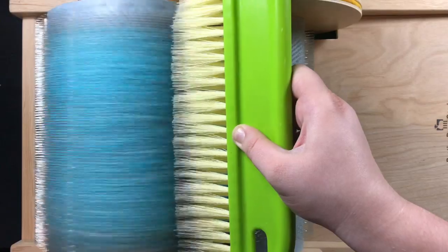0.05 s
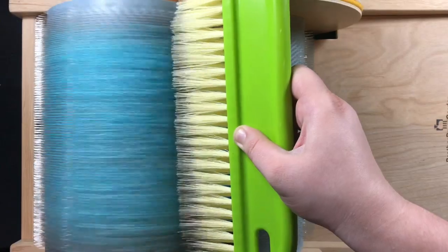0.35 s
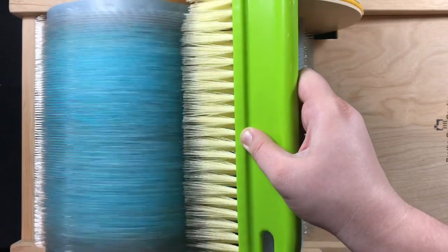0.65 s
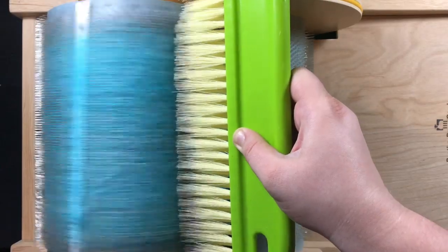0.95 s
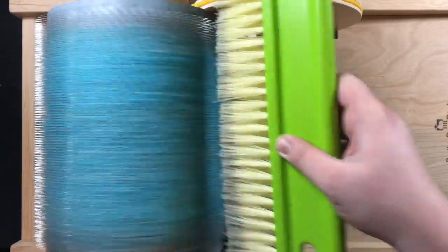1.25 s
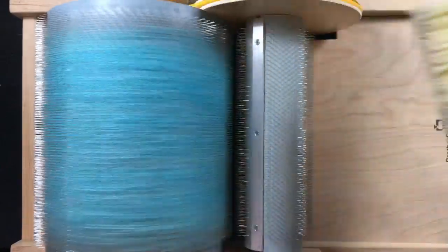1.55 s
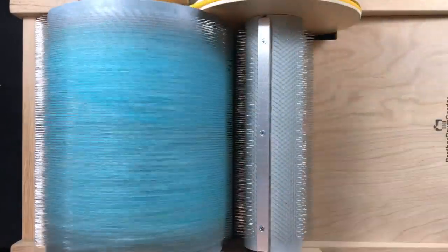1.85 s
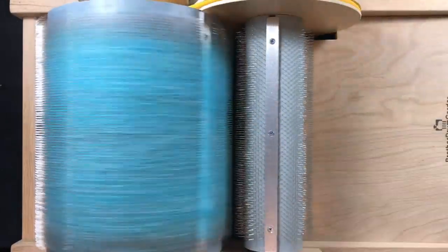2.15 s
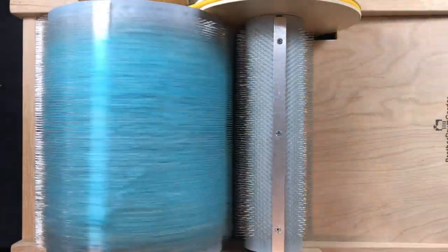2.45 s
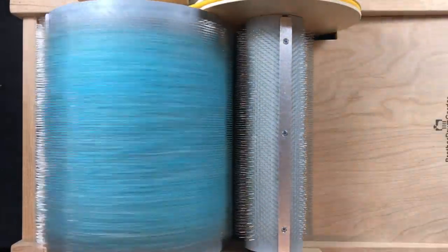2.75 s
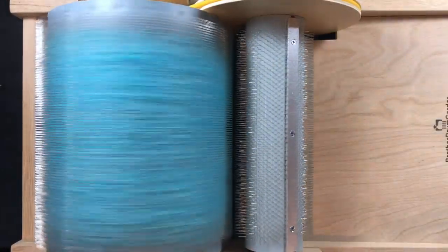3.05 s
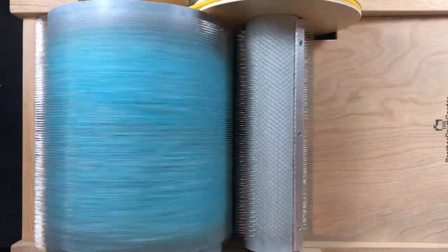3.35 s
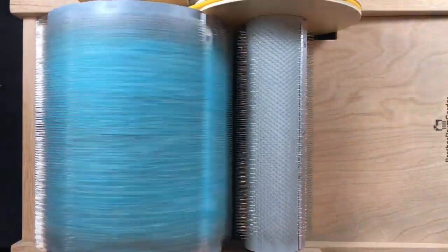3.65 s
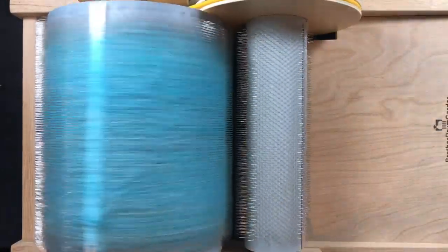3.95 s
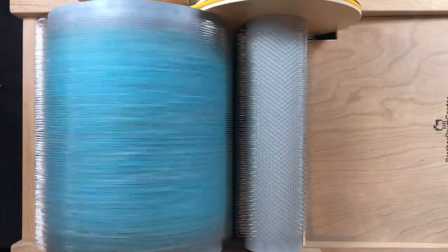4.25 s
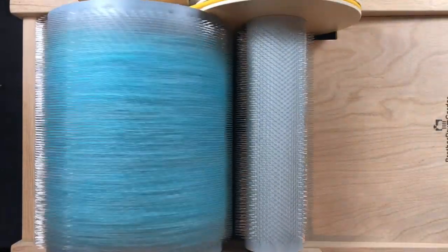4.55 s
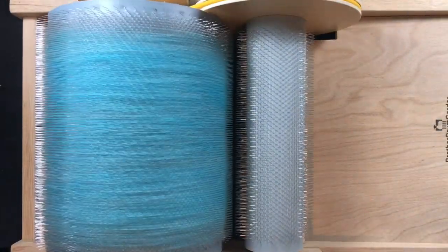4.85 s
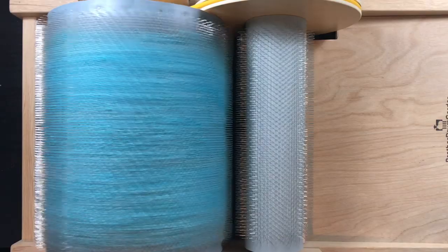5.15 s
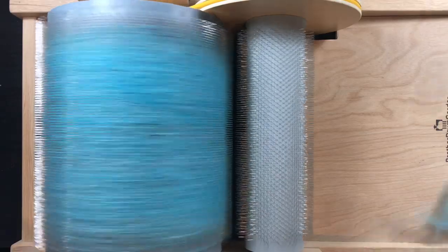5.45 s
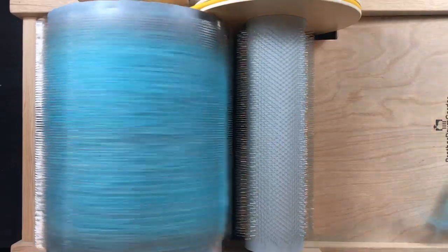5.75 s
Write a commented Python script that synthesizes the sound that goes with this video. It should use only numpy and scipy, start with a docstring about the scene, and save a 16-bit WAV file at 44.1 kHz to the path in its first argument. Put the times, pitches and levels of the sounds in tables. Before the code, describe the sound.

A stiff brush hisses briefly on a hand-cranked carding drum, which rolls on with irregular wooden knocks, a low rumble and rustling wool.

```python
"""A hand-cranked drum carder on a wooden frame, indoors over a faint hum; one microphone close above.
For the first 1.3 s a stiff brush hisses on the wire teeth, and the loose frame knocks from the start.
The drums roll on, their rumble, whirr and the rustle of wool following the effort on the crank.
A metal part clinks at 2.1 s; near 4 s a drum drags and the frame gives a hard knock.
Near 5 s the effort slackens and grazing wire tips whistle thinly; then the crank picks up again."""
import sys
import numpy as np
from scipy import signal
from scipy.fft import rfft, irfft
from scipy.io import wavfile

SR = 44100
rng = np.random.default_rng(int(sys.argv[2]) if len(sys.argv) > 2 else 0)


def put_to_file(sound):
    """Save the sound as 16-bit audio at rate SR, in the file named by the first command-line argument."""
    columns = np.atleast_2d(sound).T  # one column per channel
    safe = np.clip(columns, -1, 1)
    whole_steps = np.round(safe * 32767)
    wavfile.write(sys.argv[1], SR, whole_steps.astype(np.int16))


N = 256220
TIME = np.arange(N) / SR
RING_TIME = TIME[:SR // 2]

# spectrum of the turning drums: f/Hz, level/dB
WHIRR_SPECTRUM = [(350, 0), (500, -5.5), (750, 0.5), (1000, -2), (1400, -5.5), (2000, -10), (2600, -15),
                  (4000, -53)]
# resonances of the drums: f/Hz, width/Hz, lift/dB
DRUM_RESONANCES = [(612, 22, 12.5), (1709.3, 50.65, 12), (2950, 494.2, 8), (4105.5, 100, 2)]
# spectrum of fibres pulled over wire tips: f/Hz, level/dB
FIBRE_SPECTRUM = [(5000, -2.5), (6800, 0.5), (7800, -2.5), (8900, 3), (10400, -6), (12000, -1), (15800, -3)]


def from_db(db):
    """Decibels to gain."""
    return 10 ** (np.asarray(db) / 20)


def rms_one(x):
    """Scale to unit rms."""
    return x / np.sqrt(np.mean(x ** 2) + 1e-20)


def attack_one(x, attack_s=.035):
    """Scale a blow so that its attack has unit rms."""
    return x / np.sqrt(np.mean(x[:int(attack_s * SR)] ** 2) + 1e-20)


def gain_curve(rows):
    """A gain through rows of t/s, level/dB."""
    times, db = np.transpose(rows)
    return from_db(np.interp(TIME, times, db))


def arch(start, end):
    """A gain that swells and fades between two times."""
    progress = np.clip((TIME - start) / (end - start), 0, 1)
    return np.sqrt(np.abs(np.sin(np.pi * progress)))


def waver(per_s, depth_db):
    """A gain that wanders at random."""
    steps = rng.standard_normal(2000)
    return from_db(depth_db * np.interp(TIME * per_s, np.arange(len(steps)), steps))


def dying(t60):
    """Envelope of a free ring that falls 60 dB in t60 seconds."""
    return from_db(-60 * RING_TIME / t60)


def add(out, s, sound):
    """Mix a sound in at time s."""
    start = max(0, int(s * SR))
    out[start:start + len(sound)] += sound[:N - start]


def band(x, low_hz, high_hz, order=2):
    """Causal band-pass."""
    edges = [low_hz, min(high_hz, .45 * SR)]
    return signal.sosfilt(signal.butter(order, edges, "band", fs=SR, output="sos"), x)


def colour(x, spectrum, resonances=()):
    """Give a steady sound a spectrum that rolls off past its ends, with resonances on top; rms 1."""
    hz = np.maximum(np.fft.rfftfreq(N, 1 / SR), 1)
    points, db = np.transpose(spectrum)
    gain = from_db(np.interp(np.log(hz), np.log(points), db))
    gain *= np.minimum(1, hz / points[0]) ** 2 * np.minimum(1, points[-1] / hz) ** 2
    for centre, width, lift_db in resonances:
        gain *= 1 + (from_db(lift_db) - 1) / (1 + (2 * (hz - centre) / width) ** 2)
    return rms_one(irfft(rfft(x) * gain, N))


def flicks(per_s, spread_db, smooth_db):
    """Tiny random impulses of uneven size over a bed of countless weaker ones."""
    sizes = from_db(spread_db * np.minimum(rng.exponential(1, N), 5)) * rng.choice([-1, 1], N)
    impulses = sizes * (rng.random(N) < per_s / SR)
    return rms_one(impulses) + from_db(smooth_db) * rng.standard_normal(N)


def pings(per_s, low_hz, high_hz, t60, spread_db):
    """Wires plucked at random, each ringing briefly at a pitch of its own; rms 1."""
    when, pitch, size = rng.random((int(per_s * N / SR), 3)).T
    hz = low_hz + (high_hz - low_hz) * pitch
    height = from_db(spread_db * np.minimum(-np.log(1 - size), 4))
    age = np.arange(int(t60 * SR * .5))
    rings = height[:, None] * np.sin(2 * np.pi * hz[:, None] * age / SR) * dying(t60)[age]
    positions = (when * N).astype(int)[:, None] + age
    return rms_one(np.bincount(positions.ravel(), rings.ravel(), N)[:N])


def strike(modes, uneven_db):
    """Modes ringing after one blow, each with a random strength and sign."""
    strengths = from_db(rng.normal(0, 1, len(modes)) * uneven_db) * rng.choice([-1, 1], len(modes))
    return sum(strength * from_db(db) * np.sin(2 * np.pi * hz * RING_TIME) * dying(t60)
               for strength, (hz, db, t60) in zip(strengths, modes))


def room_tone(floor_db=-62):
    """The room murmurs faintly under a low, wavering electrical hum."""
    # partials of the hum: f/Hz, level/dB
    partials = [(119.5, -54.5), (240, -68)]
    # spectrum of the murmur: f/Hz, level/dB
    spectrum = [(25, -17.5), (42, -3), (68, 5), (95, -17), (160, -21), (320, -15), (500, -19.5),
                (2000, -34), (15000, -52)]
    hum = sum(np.sqrt(2) * from_db(db) * np.sin(2 * np.pi * hz * TIME) for hz, db in partials)
    hum *= waver(per_s=5.7, depth_db=-3.5)
    return hum + from_db(floor_db) * colour(rng.standard_normal(N), spectrum)


def singing_wires():
    """Wire tips that graze each other swell into a thin, rough whistle."""
    # whistles: start/s, end/s, f/Hz, width/Hz, level/dB
    whistles = [(4.3, 5.1, 5160, 120, -78.5), (4.4, 5.05, 2460, 100, -76), (2.28, 2.72, 5000, 900, -68),
                (2.3, 2.7, 6620, 200, -78)]
    out = np.zeros(N)
    for start, end, hz, width, level_db in whistles:
        tone = rms_one(band(rng.standard_normal(N), hz - width / 2, hz + width / 2, order=1))
        out += from_db(level_db) * arch(start, end) * tone
    return out


def swishes():
    """Bristles and loose tufts sweep lightly over the wire tips."""
    # short sweeps: start/s, end/s, level/dB
    sweeps = [(1.339, 1.445, -57), (1.461, 1.503, -63), (1.591, 1.618, -66), (2.97, 3.169, -62),
              (3.137, 3.725, -64.5), (3.458, 3.596, -63)]
    swish = colour(flicks(per_s=9000, spread_db=9.5, smooth_db=5.5233), FIBRE_SPECTRUM)
    return swish * sum(from_db(db) * arch(start, end) for start, end, db in sweeps)


def cranked(level_db, follows):
    """Gain of a sound that has level_db at the median effort and follows a share of its swing."""
    # effort on the crank: t/s, relative level/dB
    cranking = [(1.5, -58.5), (1.57, -59.5), (1.77, -63.5), (2.3, -60), (2.79, -63), (3.1, -60.5),
                (3.27, -55), (3.51, -57.5), (3.68, -60.5), (4.07, -62.5), (4.19, -61.5), (4.37, -63),
                (5.07, -74), (5.26, -65.5), (5.4, -63), (5.8, -59)]
    effort = gain_curve(cranking)
    return from_db(level_db) * (effort / np.median(effort)) ** follows


def wool():
    """Fibres slip over the wires, pluck them and tear apart between the two drums."""
    # spectrum of slipping wool: f/Hz, level/dB
    spectrum = [(1600, 3), (2300, 0.5), (3200, 0), (3700, 0), (4600, 0), (5300, -5.5), (6500, -6.5),
                (8000, -14.5)]
    wires = pings(per_s=2400, low_hz=2000, high_hz=15700, t60=0.07, spread_db=2)
    rustle = colour(flicks(per_s=1700, spread_db=1, smooth_db=7.5) + wires, spectrum, DRUM_RESONANCES)
    tearing = colour(flicks(per_s=7200, spread_db=5.5, smooth_db=2) + wires, FIBRE_SPECTRUM)
    return cranked(-65.5, follows=0.7345) * rustle + cranked(-71, follows=0.47) * tearing


def drums():
    """The rolling drums shake the frame and sing faintly at their own resonances."""
    # spectrum of the shaking frame: f/Hz, level/dB
    spectrum = [(25, -17), (42, -20.5), (63, 1), (98, -7), (130, 11.5), (172, -7.5), (225, -1.5), (275, -9),
                (340, -7), (480, -20), (800, -42)]
    rumble = colour(rng.standard_normal(N), spectrum) * waver(per_s=20, depth_db=1.1)
    whirr = colour(flicks(per_s=900, spread_db=0.5, smooth_db=-1), WHIRR_SPECTRUM, DRUM_RESONANCES)
    whirr *= waver(per_s=25, depth_db=5)
    return cranked(-53.5, follows=1) * rumble + cranked(-63, follows=0.92) * whirr


def drum_rubs():
    """A drum that drags rattles lightly against the frame."""
    # moments of harder rubbing: start/s, end/s, level/dB
    drags = [(3.156, 3.275, -65.5), (3.676, 3.898, -55), (3.935, 3.973, -46.5), (5.605, 5.796, -52)]
    # resonances of the rattle: f/Hz, width/Hz, lift/dB
    resonances = [(410, 150, 10.5), (601.4, 39, 21), (783.5, 102.4, 2.5), (1750.6, 60, 4.5)]
    rattle = colour(flicks(per_s=590, spread_db=3, smooth_db=-9.5), WHIRR_SPECTRUM, resonances)
    return rattle * sum(from_db(db) * arch(start, end) for start, end, db in drags)


def tooth_snaps(t60=0.071, gain_db=-8):
    """Single wire teeth catch and snap free with a short, bright tick."""
    # snaps: t/s, relative level/dB
    snaps = [(1.3845, -43), (1.4474, -55), (1.4964, -60), (1.6114, -57.5), (2.0762, -55.5), (3.275, -38.5),
             (3.9704, -52)]
    out = np.zeros(N)
    for s, level_db in snaps:
        tick = band(rng.standard_normal(len(RING_TIME)), 2500, 14000) * dying(t60)
        add(out, s, from_db(level_db + gain_db) * tick)
    return out


def metal_clinks(rattle_db=-6, rattle_t60=0.2014):
    """A hard contact rings a metal part, which rattles as it dies away."""
    # contacts: t/s, attack level/dB
    clinks = [(2.078, -39.5), (3.858, -60), (3.923, -60.5), (5.227, -57)]
    # modes of the part: f/Hz, level/dB, t60/s
    modes = [(690, -6, .16), (950, -6, .14), (1450, -7, .15), (1690, -5, .18), (2000, -11, .17),
             (2450, -8, .14), (2690, -2, .15), (2770, 0, .16), (3050, -7, .13), (3760, -13, .14),
             (4010, -10, .12), (4145, -7, .12), (4250, -12, .12), (5330, -17, .11), (5660, -19, .1)]
    out = np.zeros(N)
    for s, level_db in clinks:
        rattle = band(rng.standard_normal(len(RING_TIME)), 1370, 3253, order=3) * dying(rattle_t60)
        clink = attack_one(strike(modes, uneven_db=.5)) + from_db(rattle_db) * attack_one(rattle)
        add(out, s, from_db(level_db) * attack_one(clink))
    return out


def brush():
    """Bristles flick off the teeth: the brush back scratches, wires hiss, the drag shakes the frame."""
    # pressure on the brush: t/s, relative level/dB
    pressure = [(0.0, -34), (0.526, -37), (0.716, -34), (0.914, -36.5), (0.928, -34), (1.26, -37),
                (1.34, -62)]
    # spectra of the brush back, the plucked wires and the frame: f/Hz, level/dB
    back_spectrum = [(450, -11.5), (620, -4), (780, -3), (910, 2), (1150, 0.5), (1400, -6.5), (1740, -4),
                     (2100, -7), (2700, -4), (3400, -8), (3800, -14), (4200, -7), (4900, -18.5),
                     (6000, -21)]
    wire_spectrum = [(4700, -11.5), (5300, -8.5), (6300, -7.5), (7150, 0), (7800, -3), (8800, 0),
                     (9700, -3), (10500, -7.5), (11500, -5), (12700, -3), (13600, -5.5), (15800, -5)]
    frame_spectrum = [(30, -22), (65, 4), (100, -14), (160, 6), (225, -2.5), (300, -2.5), (450, -22)]
    touching = np.interp(TIME, [1.31, 1.35], [1, 0])
    wires = pings(per_s=1500, low_hz=1501.4, high_hz=15920, t60=0.12876, spread_db=2.5)
    scratch = colour(flicks(per_s=5000, spread_db=1, smooth_db=0.5) + from_db(-5) * wires, back_spectrum)
    hiss = colour(flicks(per_s=9000, spread_db=1, smooth_db=-4.5) + from_db(-6) * wires, wire_spectrum)
    shudder = colour(rng.standard_normal(N), frame_spectrum)
    brushing = from_db(-3.5) * scratch + from_db(-0.3397) * hiss + from_db(-11) * shudder
    return touching * gain_curve(pressure) * brushing


def blow(level_db, hollow_hz, clack_hz, hardness_db):
    """Contact time and register levels: hard knocks are quick and bright, deep ones boom, high tick."""
    # shares of boom, wood, clack, tick and snap: level/dB, gain per dB of hardness/dB
    shares = [(-0.4, 0), (-0.5, 0), (-4.5, 1.39), (-17, 1.5), (-28, 1.82)]
    boom, wood, clack, tick, snap = [level_db + db + slope * hardness_db for db, slope in shares]
    depth_db = 13 * np.log2(261.5 / hollow_hz)
    height_db = 3.5 * np.log2(clack_hz / 723.27)
    easing_db = 0.42 * (level_db + 38.5)  # the snap grows less than the rest in a strong knock
    contact_s = 0.0017208 * 2 ** (-hardness_db / 5)
    return contact_s, (boom + depth_db, wood, clack - height_db, tick + height_db, snap - easing_db)


def frame_knocks(swell_cycles=0.82, focus_db_per_octave=15, scuff_db=-16):
    """Each knock rings the loose frame's main modes and many weaker ones; heavy parts answer later."""
    # knocks: t/s, relative level/dB, hollow pitch/Hz, clack pitch/Hz, hardness/dB
    knocks = [(0.093, -43, 239.8, 950, -7), (0.293, -24, 373, 656, -1), (0.364, -27.5, 267, 900, 1.5),
              (0.388, -46, 216.9, 607, 4.5), (0.618, -31, 310, 780, 1), (0.841, -32.5, 257.5, 730, 1),
              (0.95, -38, 235, 950, -3.5), (1.075, -39.5, 260, 950, -18.5), (1.102, -39.5, 280, 950, -10),
              (1.379, -36.5, 225, 635, 0), (1.445, -30.5, 251, 679.1, -1), (1.718, -35.5, 210, 610, -2),
              (2.001, -49.5, 207, 1726, 2.5), (2.091, -42.5, 215.7, 618.1, 4.5),
              (2.169, -37.5, 240, 687, -3.5), (2.266, -43.5, 228.8, 660, -11.5),
              (2.51, -44.5, 198.4, 630, -8), (2.786, -41, 208.2, 628, 4), (2.795, -37.5, 137, 640, 3),
              (3.034, -42, 220, 658.1, 2), (3.06, -45, 131, 590, -12), (3.139, -37, 348.2, 582, 0),
              (3.275, -30, 295, 840, 5), (3.607, -45.5, 282.5, 1211, 1), (3.638, -29, 330.6, 660, -4),
              (3.762, -45.5, 284, 620, -5), (3.856, -52.5, 250, 597.6, 5.5), (3.92, -45.5, 390, 1210, -1.5),
              (3.969, -22.5, 392, 1420, 3.5), (3.998, -35.5, 351.9, 780, -14.5),
              (4.184, -46.5, 215, 660, -9), (4.322, -56, 280, 841, 1), (4.442, -41.5, 214, 670, 1),
              (4.54, -52.5, 283.2, 611.9, 7), (4.948, -51, 205, 588.9, 1.5), (5.012, -50.5, 199.8, 610, -3),
              (5.046, -45.5, 220, 586.3, -16.5), (5.209, -44.5, 205, 614, -2),
              (5.229, -41.5, 255, 1603, 6.5), (5.242, -36.5, 293.1, 607, -3), (5.296, -48.5, 134, 740, -8),
              (5.438, -37, 207, 616.2, -5.5), (5.484, -42, 222, 1560, -3.5), (5.542, -56.5, 240, 590, 2.5),
              (5.607, -50, 287.3, 1700, 3.5), (5.798, -55, 230, 1550, 11.5)]
    # registers, boom to snap: low/Hz, high/Hz, dense ringing's t60/s, its level re the modes/dB, delay/s
    registers = [(44.28, 198, 0.44, -25.5, 0.0018), (192, 414, 0.16, -17, 0.0011),
                 (505, 1022, 0.0987, -5, 0.00043903), (1085.9, 2130, 0.10295, -1, 0.00019905),
                 (2170, 4751.5, 0.06265, -4.5, 0.00009)]
    # modes of the wooden frame and drum: f/Hz, level/dB, t60/s
    frame_modes = [(64.574, -30, 0.72), (129.8, -4, 0.27), (156.9, -6.5, 0.1718), (199.9, 3.5, 0.11736),
                   (226.81, 1, 0.15399), (293.8, -8, 0.17), (330.1, 2, 0.13), (388.64, -2, 0.13),
                   (441.56, 16.5, 0.36), (511, 1, 0.14), (587.3, -2, 0.16933), (609, 0, 0.17),
                   (690, 5, 0.07416), (790, -3.5, 0.14), (925, -0.5, 0.0879), (974, 3, 0.09784),
                   (1152, -14.5, 0.25), (1249.1, -0.5, 0.15), (1307, -28, 0.15), (1426, 10, 0.03053),
                   (1546, -15.5, 0.266), (1706.2, -6.5, 0.1), (2000, -5.5, 0.16), (2348.1, -20.5, 0.077),
                   (2665, -14.5, 0.045), (3070, -12.5, 0.0313), (4492.8, -24, 0.044)]
    out = np.zeros(N)
    for s, knock_db, hollow_hz, clack_hz, hardness_db in knocks:
        contact_s, levels = blow(knock_db, hollow_hz, clack_hz, hardness_db)
        for level_db, (low, high, t60, dense_db, delay) in zip(levels, registers):
            modes = [mode for mode in frame_modes if low <= mode[0] < high]
            dense = band(rng.standard_normal(len(RING_TIME)) * dying(t60), low, high, order=3)
            # the place of the blow favours the modes near its two pitches
            for pitch in (hollow_hz, clack_hz):
                if low <= pitch < high:
                    modes = [(hz, db - focus_db_per_octave * abs(np.log2(hz / pitch)), decay)
                             for hz, db, decay in modes]
                    dense = band(dense, pitch * .78, pitch * 1.4, order=1)
            ring = attack_one(strike(modes, uneven_db=1.2)) + from_db(dense_db) * attack_one(dense)
            # a soft contact builds the ringing up slowly
            swell = 1 - np.exp(-(RING_TIME / (contact_s + swell_cycles / high)) ** 2)
            add(out, s + delay, from_db(level_db) * attack_one(ring * swell))
            # the loose parts scuff each other before they meet, longer when they close slowly
            lead_s = min(2.6116 * contact_s, 0.007496)
            scuff = band(rng.standard_normal(len(RING_TIME)) * dying(t60) * swell, low, high)
            add(out, s - lead_s, from_db(level_db + scuff_db) * attack_one(scuff))
    return out


def scene():
    """The carder from close above, dead centre and the same in both channels."""
    contacts = from_db(-2) * frame_knocks() + metal_clinks() + tooth_snaps()
    mono = contacts + brush() + drums() + drum_rubs() + wool() + swishes() + singing_wires() + room_tone()
    return np.stack([mono, mono])


def record(dry):
    """A steep low-pass cuts the top off the microphone's signal."""
    cutoff_hz = 15780
    return signal.sosfilt(signal.ellip(12, .1, 80, cutoff_hz, fs=SR, output="sos"), dry)


dry = scene()
out = record(dry)
put_to_file(out)
```